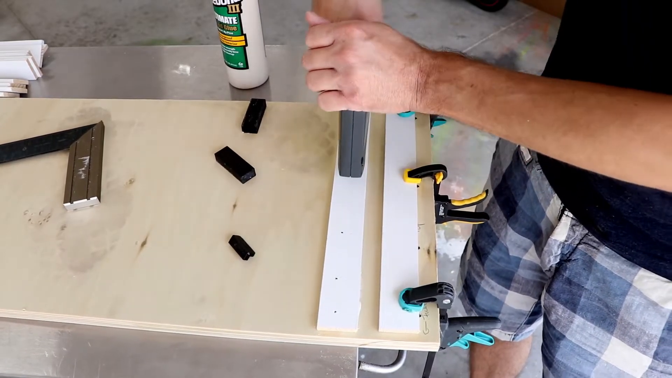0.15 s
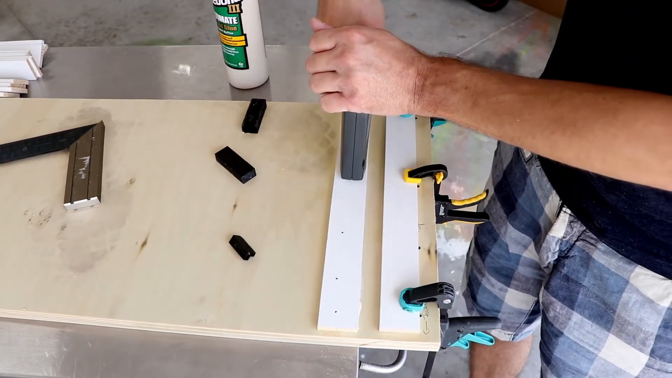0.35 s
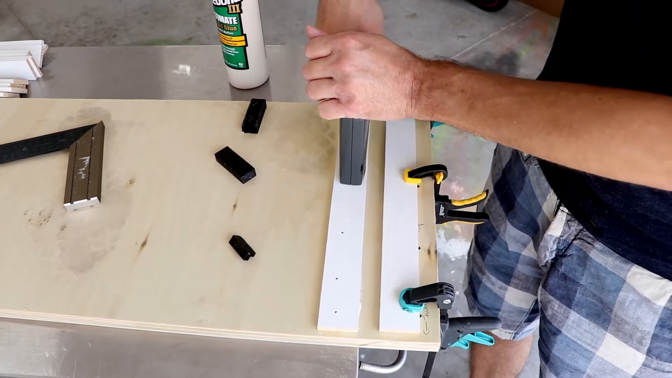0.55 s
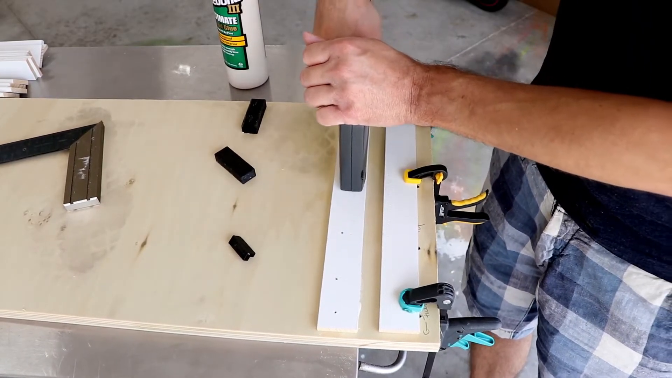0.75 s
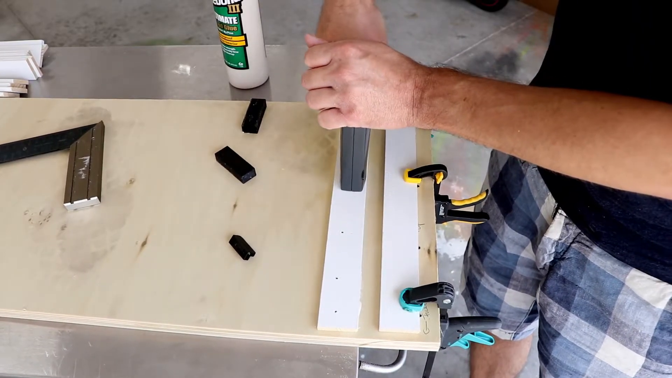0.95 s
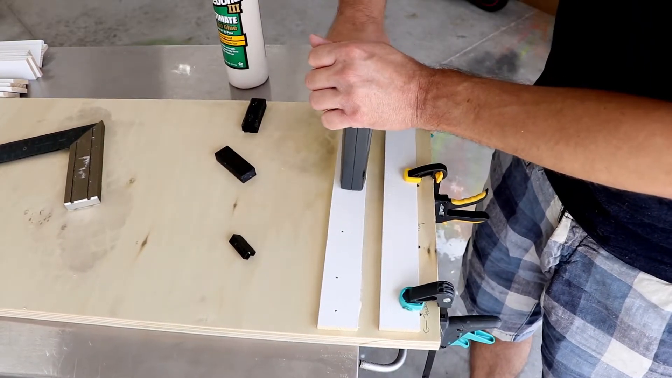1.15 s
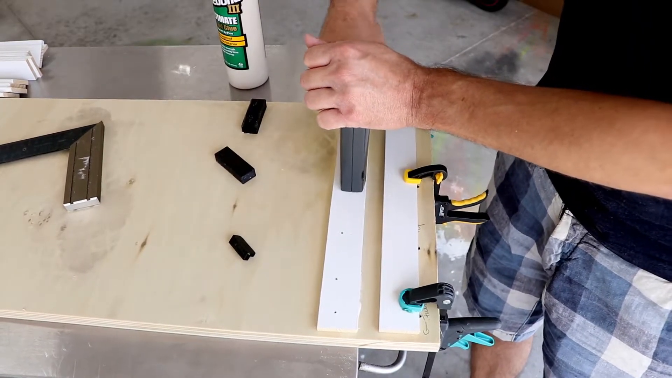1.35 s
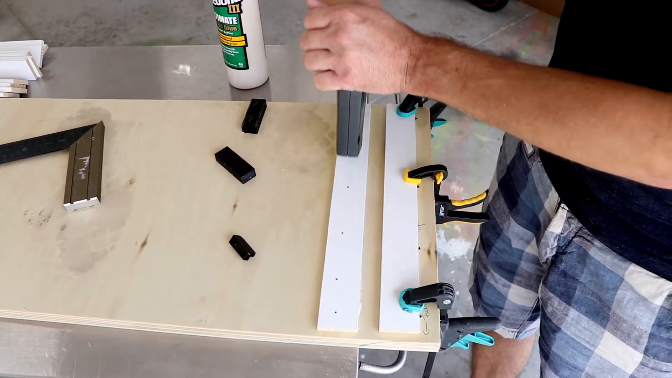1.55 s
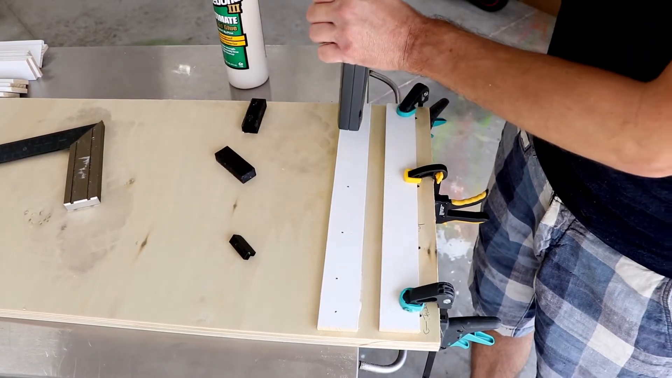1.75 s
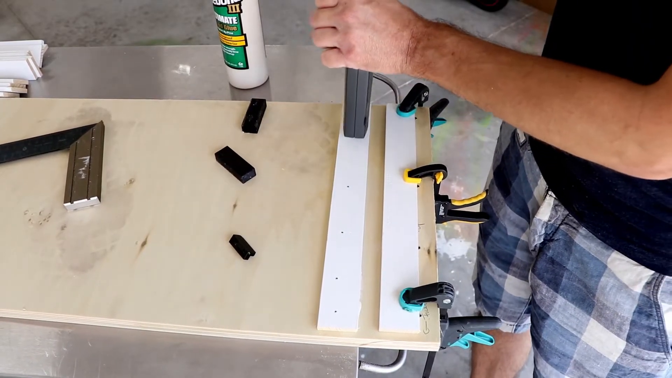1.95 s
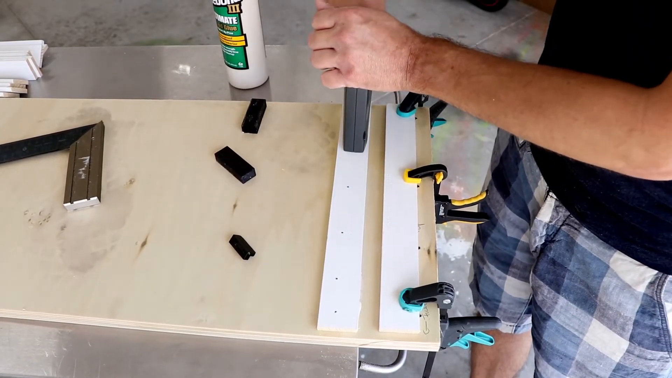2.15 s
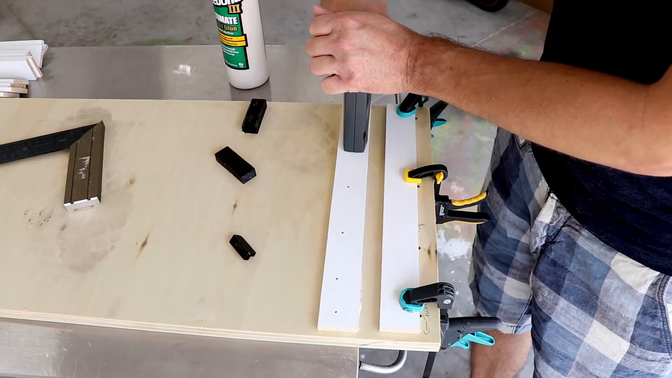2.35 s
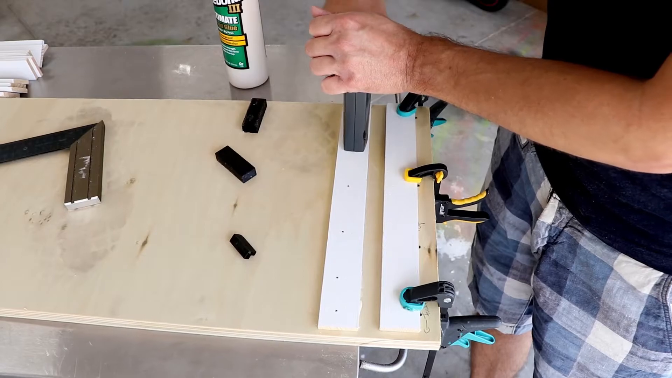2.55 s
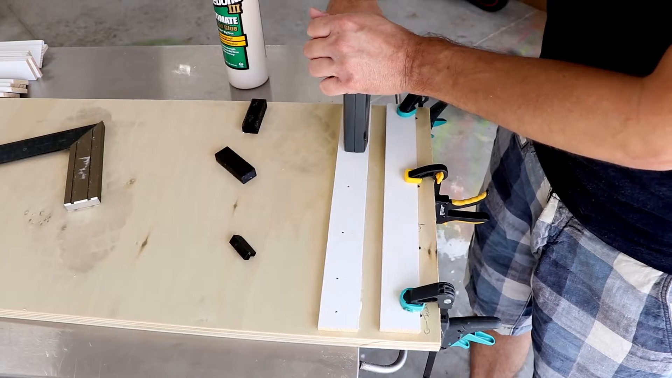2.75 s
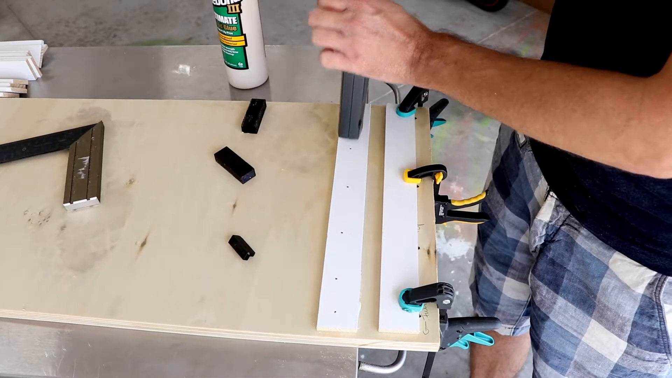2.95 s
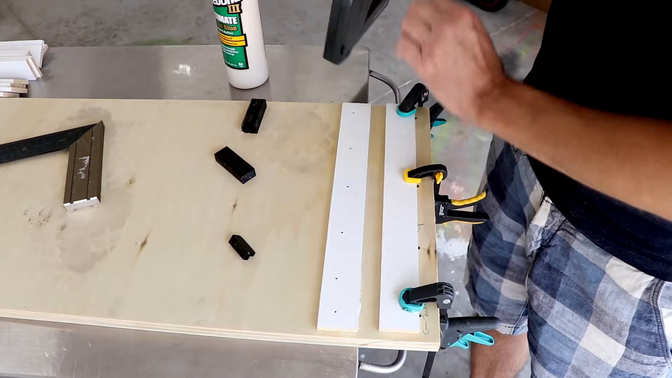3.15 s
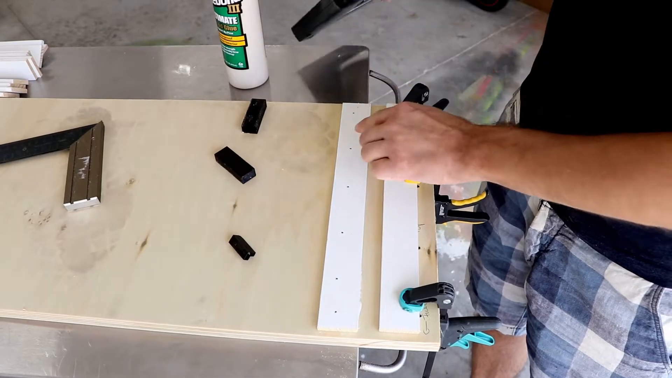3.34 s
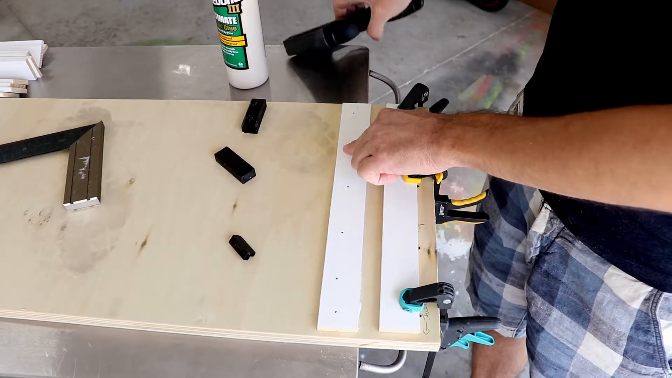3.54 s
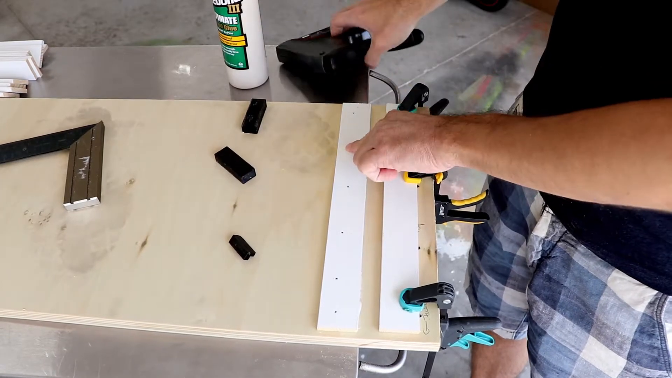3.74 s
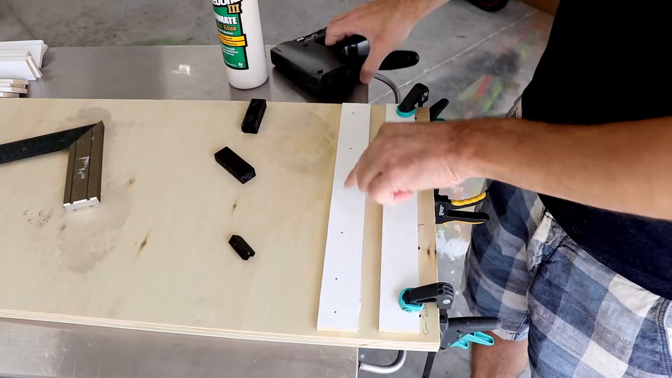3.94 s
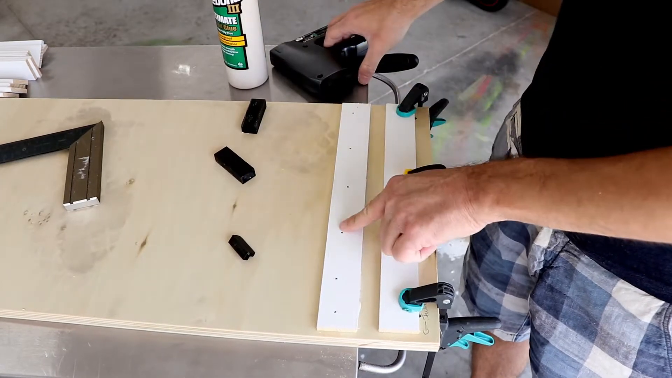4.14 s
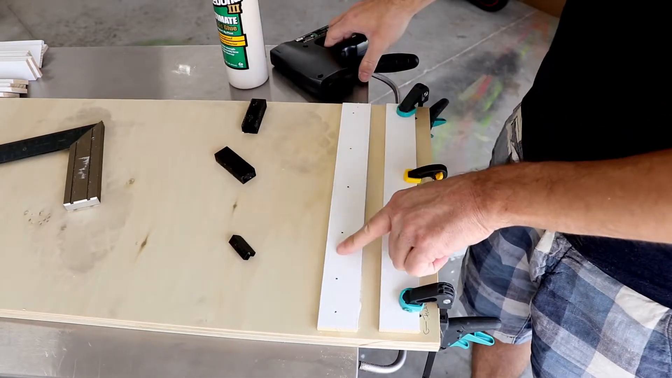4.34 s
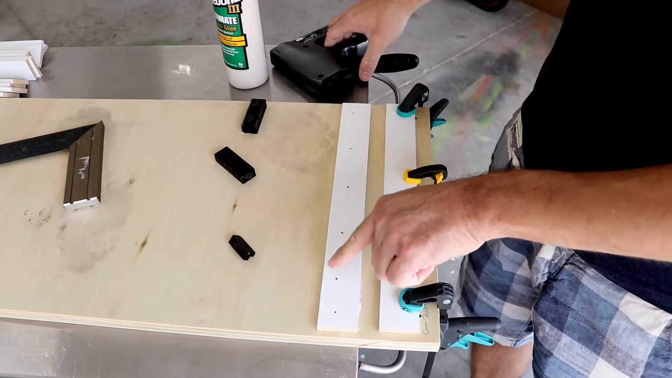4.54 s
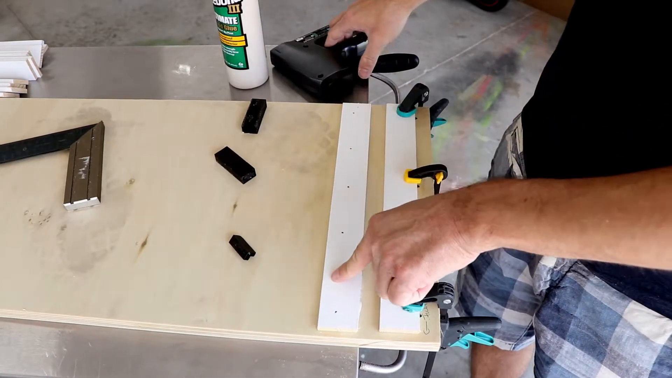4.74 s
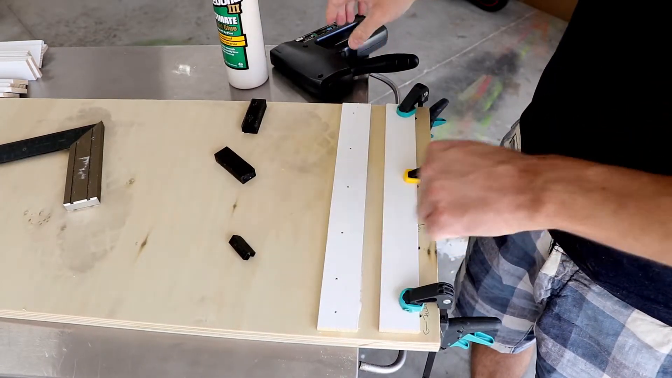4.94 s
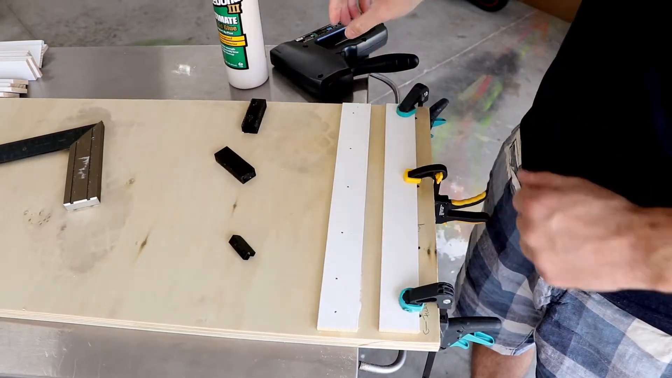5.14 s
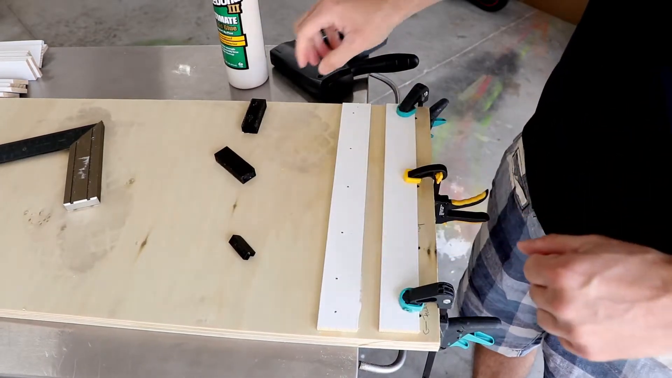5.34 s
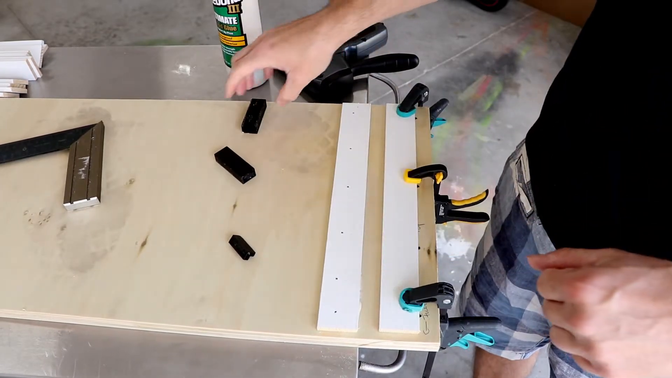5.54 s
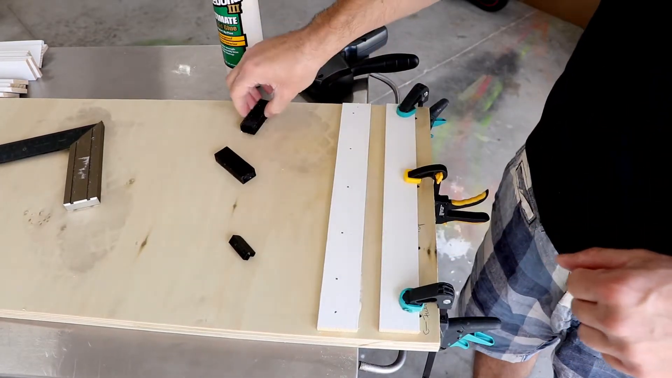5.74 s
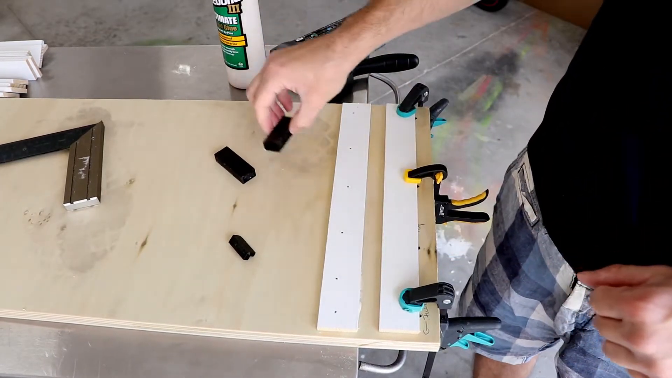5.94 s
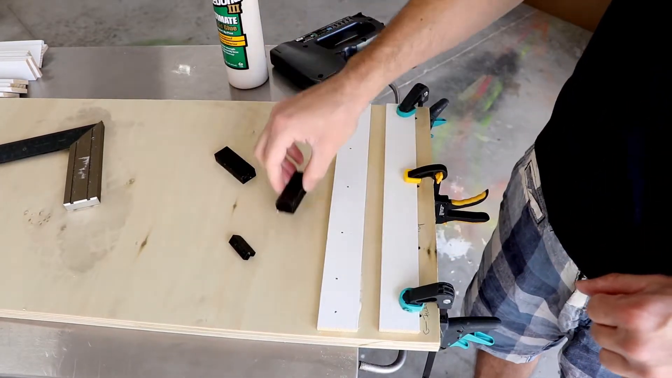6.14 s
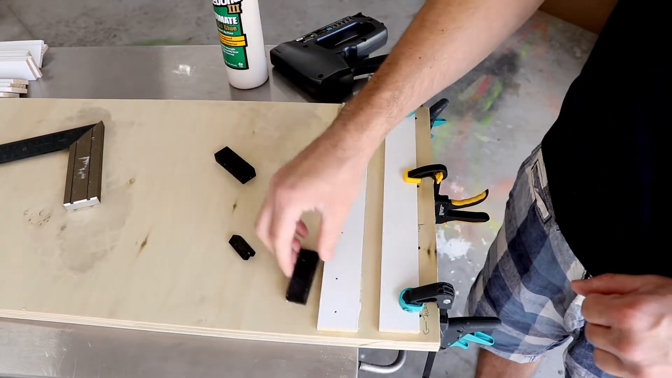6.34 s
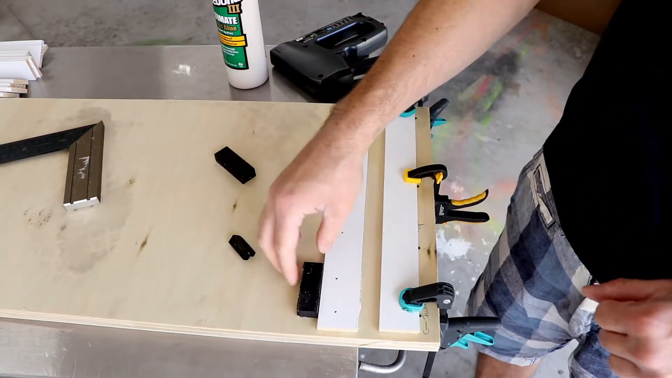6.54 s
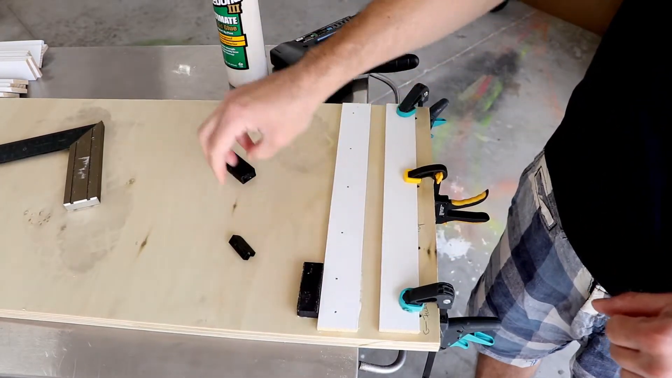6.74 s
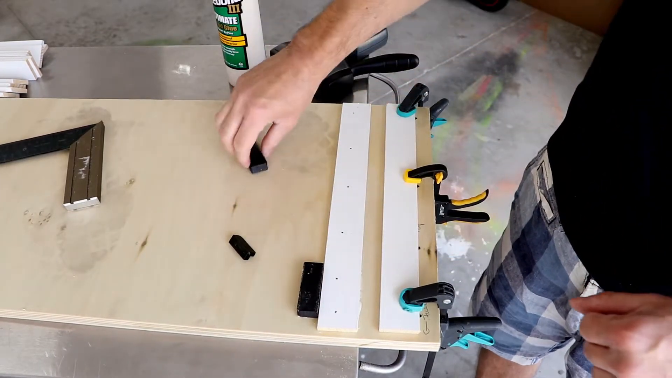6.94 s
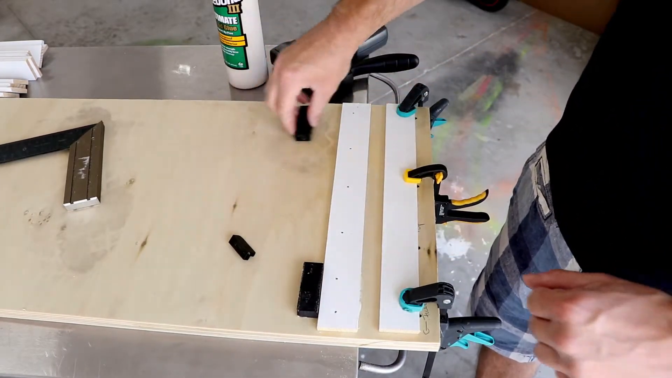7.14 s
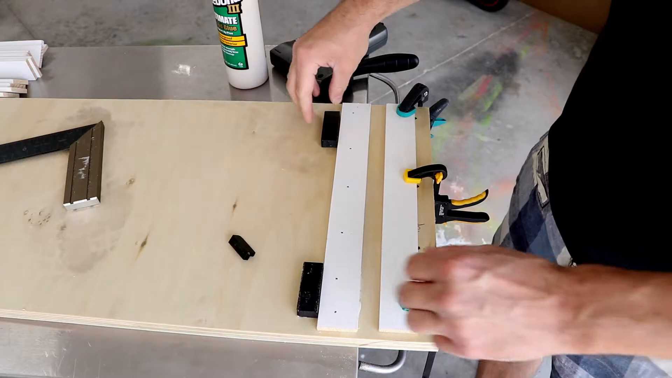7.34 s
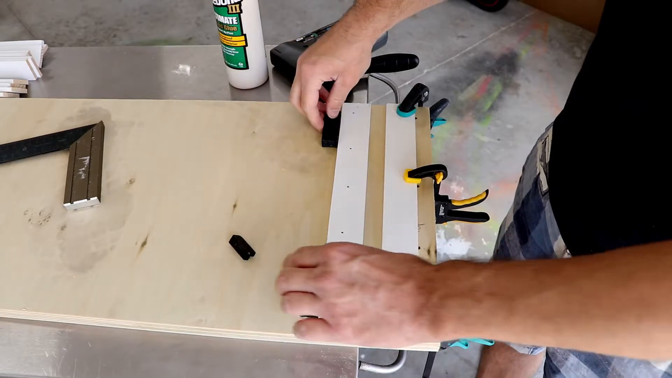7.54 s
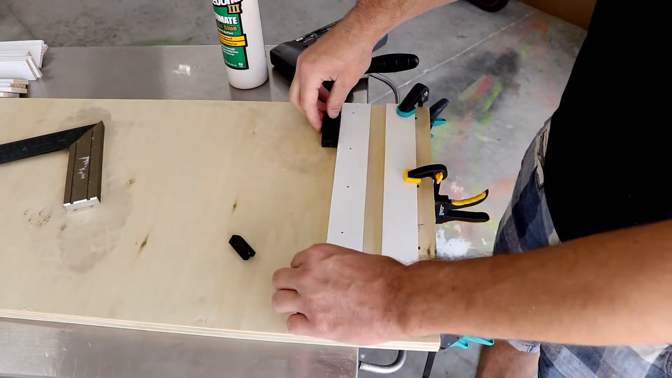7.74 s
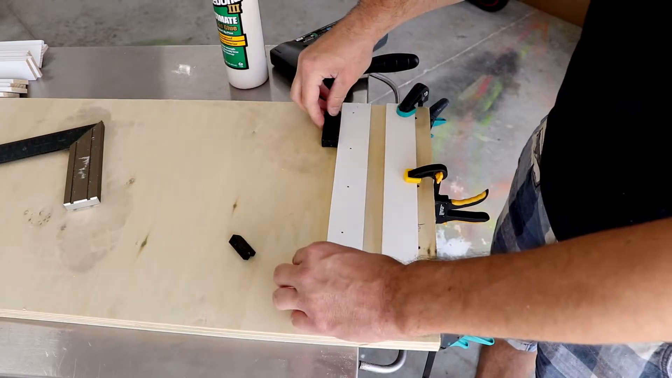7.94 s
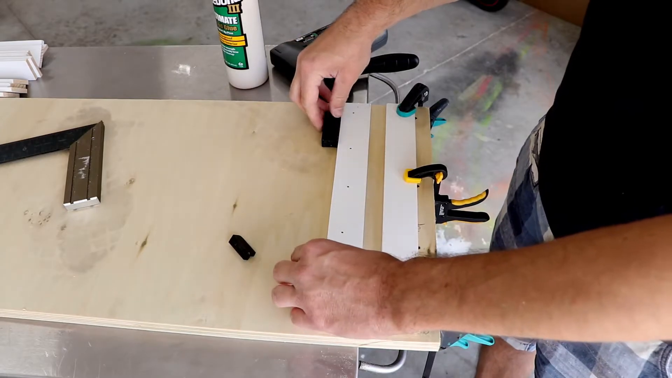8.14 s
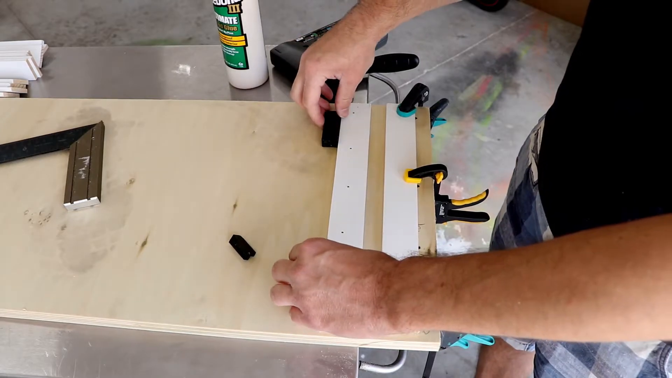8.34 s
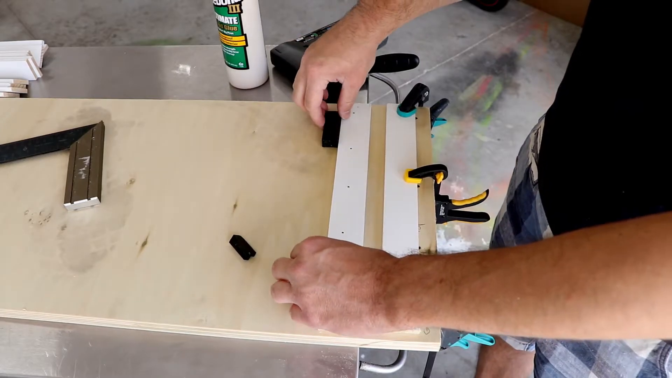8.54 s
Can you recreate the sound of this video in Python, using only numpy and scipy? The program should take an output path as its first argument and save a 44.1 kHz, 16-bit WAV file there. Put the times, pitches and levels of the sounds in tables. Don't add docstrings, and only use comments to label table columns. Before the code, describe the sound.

Close stereo pickup in a garage workshop with soft low air noise. A residual bench hum dies away, faint nudges tick, then an electric stapler cracks very loudly twice through wood over steel, distorting and leaving a humming tail. Ticks and a clattering set-down on the steel bench come next, then near silence, one dry wooden clack, and fainter rasps and taps of a second block.

```python
import sys
import numpy as np
from scipy import signal
from scipy.fft import rfft, irfft, next_fast_len
from scipy.io import wavfile
from scipy.ndimage import uniform_filter1d, map_coordinates

SR = 44100
rng = np.random.default_rng(int(sys.argv[2]) if len(sys.argv) > 2 else 0)


def attenuation_scalar(level_db):
    decades = np.asarray(level_db, float) / 20
    return 10 ** decades


def output_pcm(signal):
    pcm = np.clip(np.atleast_2d(signal).T, -1, 1) * 32767
    wavfile.write(sys.argv[1], SR, np.round(pcm).astype(np.int16))


N = 383229
LEAD = SR // 2


def unit(x):
    return x / np.sqrt(np.mean(x ** 2) + 1e-20)


def along(points, hz):
    point_hz, value = np.transpose(points)
    return np.interp(np.log(hz + 1), np.log(point_hz + 1), value)


def add(track, s, x):
    part = track[..., LEAD + round(s * SR):][..., :x.shape[-1]]
    part += x[..., :part.shape[-1]]


def pan(db):
    return attenuation_scalar(np.array([[db / 2], [-db / 2]]))


def noise(spectrum, alike, size):
    m = next_fast_len(size)
    hz = np.fft.rfftfreq(m, 1 / SR)
    turn = np.arccos(np.clip(along(alike, hz), -1, 1)) / 2
    white = rfft(rng.standard_normal((2, m)))
    mid, side = white * attenuation_scalar(along(spectrum, hz)) * [np.cos(turn), np.sin(turn)]
    return unit(irfft(np.array([mid + side, mid - side]), m)[:, :size])


def fade(t, t60, rise):
    return attenuation_scalar(-60 * t / t60) * (1 - np.exp(-t / rise))


def ring(modes, t, rise, drift=0):
    hz, db, t60 = np.transpose(modes)[:, :, None]
    gain = attenuation_scalar(db + 2 * rng.standard_normal(db.shape))
    knots = rng.standard_normal((len(hz), 40))
    wander = np.array([np.interp(t, np.linspace(0, t[-1], len(k)), k) for k in knots])
    partials = gain * np.sin(2 * np.pi * hz * t + drift * wander) * fade(t, t60, rise)
    return np.sum(partials, axis=0)


def spread(make, width):
    return make() + width * np.array([[1], [-1]]) * make()


def click(treble_db, t, t60):
    colour = [(600, -29.5), (1500, -1.5), (3000, -1.5), (5000, -9.0), (7000, treble_db + 0.5),
              (12000, treble_db - 6), (16000, treble_db - 20.0)]
    burst = noise(colour, [(1000, 0.6)], len(t)) * fade(t, t60, 0.00023)
    return 2 * np.sqrt(1 + attenuation_scalar(treble_db) ** 2) * burst / np.abs(burst).max()


# pitch_hz [Hz], t60_s [s]
WALL_DECAY = [(100, .45), (300, 0.75), (1000, 0.57), (2500, 0.53), (6000, 0.53), (14000, .4)]
# pitch_hz [Hz], likeness [-1..1]
DIFFUSE_LIKENESS = [(60, 0.81), (180, 0.92), (550, 0.91), (1650, 0.24), (4970, -0.093), (15000, -0.05)]


def tail(spectrum, build, size=SR):
    hz, t, z = signal.stft(noise(spectrum, DIFFUSE_LIKENESS, size), SR, nperseg=256)
    patches = uniform_filter1d(rng.standard_normal(z.shape[1:]), size=2, axis=0)
    patches = uniform_filter1d(patches, size=30, axis=1)
    decay_db = -60 * t / along(WALL_DECAY, hz)[:, None]
    z = z * attenuation_scalar(1.6 * unit(patches) + decay_db)
    x = signal.istft(z, SR, nperseg=256)[1][:, :size]
    return x * (1 - np.exp(-np.arange(size) / SR / build))


# pitch_hz [Hz], level_db [dB], t60_s [s]
PLYWOOD_MODES = [(140, -14, 0.069), (209.5, -2.5, 0.2), (285, -2.5, 0.39), (342.4, 0, 0.3),
                 (391, -5.5, 0.55), (416.2, 0.5, 0.23), (448.1, -1, 0.16), (489.8, -3.5, 0.13),
                 (553, -4, .2), (664, -9.5, 0.31), (750, -11, 0.24)]
# pitch_hz [Hz], level_db [dB], t60_s [s]
STEEL_MODES = [(212.3, -4, 2.6), (209, -8, 2), (474, -9, 1.4), (162, -11.5, 2), (291.36, -6, 1.9),
               (333.5, -6, 1.8), (362, -5.5, 1.8), (396, -7, 1.6), (446, -9.5, 1.6), (526, -13, 1.7)]
# pitch_hz [Hz], level_db [dB per Hz]
STEEL_DRONE = [(110, -26), (160, -5.5), (250, 0.5), (400, 1), (600, -9), (1200, -15.5), (2500, -36.5)]


def bench(t):
    thud = spread(lambda: ring(PLYWOOD_MODES, t[:len(t) // 2], .002, drift=.6), width=.2)
    hum = spread(lambda: ring(STEEL_MODES, t, 0.017, drift=0.67), width=.15)
    drone = noise(STEEL_DRONE, DIFFUSE_LIKENESS, len(t)) * fade(t, 1.5, .01)
    return thud, hum + attenuation_scalar(-3) * drone


# pitch_hz [Hz], level_db [dB per Hz]
CLANG_COLOUR = [(450, -19.5), (700, -7), (960, 0.5), (1080, 0), (1260, 0), (1600, -3.5), (2400, -8.5),
                (3800, -14.5), (5000, -27)]
# pitch_hz [Hz], level_db [dB], t60_s [s]
CLANG_LINES = [(477, -1, 1.6), (646.7, -9.5, 1.8), (731.3, -6, 1.7), (955, -4.5, 1.8), (1011.3, -6.5, 1.5),
               (1094, -0.5, 1.4), (1150, -4.5, 2), (1266, -2.5, 1.9), (1325, -2.5, 0.65)]


def clang(t, t60):
    wash = noise(CLANG_COLOUR, DIFFUSE_LIKENESS, len(t)) * fade(t, t60, .02)
    lines = spread(lambda: ring(CLANG_LINES, t, .01, drift=0.98), width=.5)
    return attenuation_scalar(0.5) * wash + attenuation_scalar(-7.0) * lines


# start_s [s], level_db [dB peak], trigger_lead_s [s], trigger_db [dB], plunger_lead_s [s]
SHOTS = [
    (-.3, -0.5, .03, -50, .01),
    (1.2155, 3, .0301, -58.5, .008),
    (2.6756, 4, .0275, -34.5, .0114),
]
# pitch_hz [Hz], level_db [dB per Hz]
DRIVER_CRACK = [(88, -38.5), (150, -9), (562, -6.5), (1180, -12.5), (2240, -0.5), (3630, -5.5), (4160, 1),
                (5060, -11.5), (5570, -6), (7750, -7.5), (9240, -5), (13100, -12), (15600, -20)]
# pitch_hz [Hz], level_db [dB per Hz]
WALL_ANSWER = [(200, -28.5), (330, -9.5), (480, -6), (620, -11.5), (900, -13), (1270, -7.5), (1630, -5),
               (2330, -3.5), (2940, -7.5), (4150, -6), (4700, -14.5), (6800, -8), (9400, -6), (15600, -20)]


def gun():
    plunger_db, blow_db, hum_db = -21.5, -24.5, -42.5
    clang_db, wall_db, reset_db = -51, -15.5, -38.5
    reset_s = .2237
    out, t = np.zeros((2, N + LEAD)), np.arange(3 * SR // 2) / SR
    near = t[:SR // 10]
    crack_likeness = [(300, 0.83), (1400, 0.79), (6000, .4), (15000, 0.29)]
    for s, db, trigger_s, trigger_db, plunger_s in SHOTS:
        add(out, s - trigger_s, attenuation_scalar(trigger_db - 3.5) * pan(-2) * click(1.5, near, 0.049))
        add(out, s - plunger_s, attenuation_scalar(db + plunger_db - 2) * pan(-1.5) * click(-6, near, 0.012))
        stroke = attenuation_scalar(-60 * (near / .02) ** 2) + attenuation_scalar(-16 - 60 * near / 0.06)
        stroke = stroke * (1 - np.exp(-(near / .0033) ** 2))
        crack = stroke * noise(DRIVER_CRACK, crack_likeness, len(near))
        add(out, s, attenuation_scalar(db - 0.5) * pan(-1.4) * crack)
        jolt = ring([(38.2, -0.5, 0.051), (80, -2, .06)], near, .003)
        add(out, s + 0.0034, attenuation_scalar(db + blow_db - 5) * pan(-2.5) * jolt)
        thud, hum = bench(t)
        add(out, s + .003, attenuation_scalar(db + blow_db) * thud)
        add(out, s + .003, attenuation_scalar(db + hum_db) * hum + attenuation_scalar(db + clang_db) * clang(t, 2.2))
        add(out, s + .006, attenuation_scalar(db + wall_db) * tail(WALL_ANSWER, build=0.0029))
        add(out, s + reset_s, attenuation_scalar(db + reset_db - 3.5) * pan(-1.3) * click(4, near, .028))
    return out


# pitch_hz [Hz], level_db [dB per Hz]
AIR_COLOUR = [(15, -23), (35, -6), (65, 4), (95, -4), (160, -2), (250, -6.5), (400, -7), (700, -11.5),
              (1400, -16.5), (2800, -23), (4300, -29), (5200, -32), (9000, -29), (13300, -34.5),
              (14600, -59.5)]
# pitch_hz [Hz], likeness [-1..1]
AIR_LIKENESS = [(60, 0.81), (180, 1), (550, 0.44), (1650, 0.02), (4970, 0.03), (15000, 0.08)]
# start_s [s], end_s [s], pitch_hz [Hz], level_db [dB rms]
WHINES = [(3.44, 3.574, 2063, -76), (5.212, 5.34, 1330, -73), (5.22, 5.295, 1057, -70),
          (4.851, 6.05, 2476, -86), (6.27, 6.38, 4120, -84.5), (7.77, 7.85, 2490, -76),
          (8.08, 8.6, 2490, -87.5), (7.9, 8.647, 2801, -85), (7.95, 8.3, 4100, -89),
          (8.097, 8.58, 1239, -77.5), (8.3, 8.68, 2210, -88)]


def background():
    t = np.arange(N) / SR

    def slow(rate):
        return map_coordinates(rng.standard_normal(int(N * rate / SR) + 4), [t * rate])

    out = attenuation_scalar(-61 + 0.66 * slow(3.1)) * noise(AIR_COLOUR, AIR_LIKENESS, N)
    for start, end, hz, db in WHINES:
        on = np.clip(np.minimum(t - start, end - t) / 0.031, 0, 1)
        level = attenuation_scalar(db + 4.0 + 2.0 * (slow(7) + slow(21)))
        out = out + on * level * np.sin(2 * np.pi * hz * t + 2 * slow(36))
    return out


# start_s [s],
# level_db [dB peak]
TICKS = [(0.2674, -60), (0.296, -57), (0.7024, -62), (0.9764, -63), (0.9956, -52), (2.4024, -50.5),
         (2.8993, -23.5), (3.0104, -45), (3.3707, -48), (3.8057, -49), (3.9474, -53), (3.9985, -35),
         (4.0075, -37.5), (4.0444, -27), (4.8744, -57), (5.7094, -55)]
# start_s [s], level_db [dB peak]
SPRING_TICKS = [(1.0436, -52), (2.2904, -66), (2.4487, -53), (2.9624, -41.5), (4.019, -34.5),
                (4.0297, -37.5), (4.0683, -37), (7.2614, -54)]
# start_s [s], level_db [dB peak]
EDGE_TICKS = [(6.7558, -60), (6.9914, -58), (7.2494, -57.5)]
# start_s [s, full grip], length_s [s], hiss_db [dB], body_db [dB over hiss]
SLIDES = [(1.046, 0.0017, -64.5, 6), (1.113, 0.088, -78.5, 15.5), (5.16, .04, -72.5, -5.5),
          (5.712, .005, -63, .5), (6.767, .05, -64.5, -19), (6.952, 0.051, -60, 4),
          (7.063, 0.0018, -46.5, -2), (7.095, 0.019, -71, 0), (7.204, .014, -52.5, 3),
          (7.248, .018, -70, -11)]
# pitch_hz [Hz], level_db [dB per Hz]
RASP_COLOUR = [(1760, -33.5), (3000, -4.5), (4670, -15.5), (5620, -5.5), (7510, -2.5), (8220, 2),
               (9110, -8), (13500, -14), (15600, -27)]
# pitch_hz [Hz], level_db [dB per Hz]
RUB_COLOUR = [(180, -33), (300, -3.5), (483, -2.5), (751, -10), (1100, 0), (1590, -16.5), (2080, -6.5),
              (2440, -9.5), (3930, -18.5), (4500, -24.5), (5850, -56), (9900, -120)]


def ticks():
    grip_rate, sag_rate, lift_rate = 1400, 130.5, 649
    out, near = np.zeros((2, N + LEAD)), np.arange(SR // 20) / SR
    for rows, treble_db in (TICKS, -13), (SPRING_TICKS, 3), (EDGE_TICKS, 10):
        for s, db in rows:
            add(out, s, attenuation_scalar(db - 2.5) * pan(-2.4) * click(treble_db, near, .016))
    t = np.arange(-SR // 20, SR // 4) / SR
    for s, length, hiss_db, body_db in SLIDES:
        grip_db = grip_rate * np.minimum(t, 0) - sag_rate * np.clip(t, 0, length)
        grip_db = grip_db - lift_rate * np.maximum(t - length, 0)
        grain = uniform_filter1d(rng.standard_normal(len(t)), size=90)
        grit = attenuation_scalar(2.2 * unit(grain))
        hiss = noise(RASP_COLOUR, [(1000, 0.55)], len(t))
        body = noise(RUB_COLOUR, [(1000, .7)], len(t))
        add(out, s + t[0], attenuation_scalar(hiss_db + grip_db) * unit(grit) * (hiss + attenuation_scalar(body_db) * body))
    walls = tail([(100, -7), (500, 1.5), (4000, -1.5), (15000, -5.0)], build=.006)
    walls = np.pad(walls, ((0, 0), (260, 0)))
    walls = walls / np.linalg.norm(walls[0])
    wet = signal.fftconvolve(out.mean(0)[None], walls, axes=1)[:, :N + LEAD]
    return out + attenuation_scalar(-7.5) * wet


# start_s [s], bench_db [dB], click_db [dB over bench]
NUDGES = [(0.4634, -45.5, -15.5), (0.5236, -41, -11.5), (2.15, -47, -15), (2.1741, -51, -15),
          (3.8135, -48, -7)]
# start_s [s], level_db [dB peak], knock_db, bench_db, clang_db [dB over peak]
LAYDOWN = [
    (3.5754, -18, -15, -12, -40.5),
    (4.022, -27.5, -7.5, -5, -17),
    (4.0502, -28, -8.5, -24.5, -35),
    (4.0656, -31, -3, -12.5, -31),
]
# start_s [s], level_db [dB peak], pitch_hz [Hz]
PUSHES = [(0.4627, -55, 333), (0.5253, -29.5, 388), (2.152, -36.5, 212.5), (2.8997, -26, 2790),
          (2.9, -27.5, 3370), (3.579, -26.5, 321), (3.9994, -38.5, 1440), (4.0226, -23.5, 588),
          (4.046, -27.5, 714), (4.058, -41, 910), (4.066, -26.5, 570), (6.4398, -38.5, 1760),
          (6.4423, -37, 2900), (7.55, -51, 1070), (6.962, -50, 1160), (6.977, -43.5, 1142),
          (6.995, -48.5, 1080), (7.062, -43, 1070), (7.201, -47, 567), (7.22, -43, 558), (7.56, -49, 297)]


def handling():
    out, t = np.zeros((2, N + LEAD)), np.arange(SR) / SR
    near = t[:SR // 10]
    knock_colour = [(300, -27), (500, -0.5), (1400, -2.5), (2500, -20)]
    soft = [(s, db + click_db, -20, -4, -click_db, -27) for s, db, click_db in NUDGES]
    hard = [(s, db, -9, knock_db, bench_db, -6) for s, db, knock_db, bench_db, _ in LAYDOWN]
    for s, db, treble_db, knock_db, bench_db, wall_db in soft + hard:
        knock = noise(knock_colour, [(1000, 0.7)], len(near)) * fade(near, .04, .0005)
        add(out, s, attenuation_scalar(db - 4.5) * (click(treble_db, near, .015) + attenuation_scalar(knock_db + 4.0) * knock))
        thud, hum = bench(t)
        add(out, s, attenuation_scalar(db + bench_db - 6.5) * thud)
        add(out, s, attenuation_scalar(db + bench_db - 15) * hum)
        colour = [(120, -22), (300, bench_db + 6.5), (700, knock_db + 10.5), (1300, knock_db + 11.5),
                  (2500, -1), (4300, -7.5), (5000, treble_db), (9500, treble_db), (15500, treble_db - 15)]
        answer = tail(colour, build=0.0032, size=3 * SR // 4)
        add(out, s + 0.0046, attenuation_scalar(db + bench_db + wall_db) * answer)
    for s, db, hz in PUSHES:
        t60 = max(0.028, 13 / hz)
        add(out, s, attenuation_scalar(db) * np.sin(2 * np.pi * hz * near) * fade(near, t60, 0.00018))
    for s, db, _, _, clang_db in LAYDOWN:
        add(out, s, attenuation_scalar(db + clang_db) * clang(t, 1.0))
    return out


# start_s [s], level_db [dB peak], edge_db [dB treble ring], sheet_db [dB]
BLOCKS = [
    (6.4034, -29, 2, -17.5),
    (6.4086, -20.5, -1, -17.5),
    (6.4398, -32.5, -12, -30),
    (7.1923, -53, -7, -13),
    (7.1998, -36, -12, -31),
    (7.5507, -47, -7, -15),
]
# pitch_hz [Hz], level_db [dB], t60_s [s]
BLOCK_MODES = [(1040, -4, 0.028), (1840, -11, 0.0067), (2300, -6, 0.016), (2830, -13, 0.0064),
               (3930, -7, 0.018)]
# pitch_hz [Hz], level_db [dB], t60_s [s]
EDGE_MODES = [(8050, 10.5, 0.0056), (8100, 7, 0.0036), (10104, -10, .005), (13005, -16, .005)]


def blocks():
    out, t = np.zeros((2, N + LEAD)), np.arange(SR // 4) / SR
    for s, db, edge_db, sheet_db in BLOCKS:
        body = ring(BLOCK_MODES, t, 0.00028) + attenuation_scalar(edge_db + 0.5) * ring(EDGE_MODES, t, .0002)
        thud = attenuation_scalar(sheet_db + 1.5) * ring([(399, 2.2, 0.21), (535, 2.5, 0.081)], t, 0.0036)
        contact = 1.8 * click(edge_db - 5.0, t, 0.0092)
        add(out, s, attenuation_scalar(db - 8) * pan(-1.9) * (body + thud + contact))
        colour = [(250, -12.0), (400, 2.5), (1000, 5.5), (3500, 5.5), (5000, -8.5),
                  (8000, edge_db + 5.5), (10000, edge_db - 9), (15500, edge_db - 20.0)]
        answer = tail(colour, build=0.0049, size=SR // 2)
        add(out, s + 0.0045, attenuation_scalar(db + sheet_db - 4.5) * answer)
    return out


def scene():
    struck = gun() + ticks() + handling() + blocks()
    return struck[:, LEAD:] + background()


def top_cut(x):
    return signal.sosfilt(signal.butter(12, 15760, fs=SR, output="sos"), x)


def record(dry):
    mix = np.clip(dry, -1, 1)
    return top_cut(mix)


dry = scene()
out = record(dry)
output_pcm(out)
```